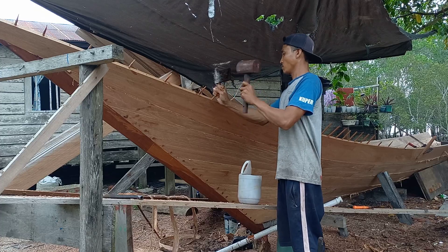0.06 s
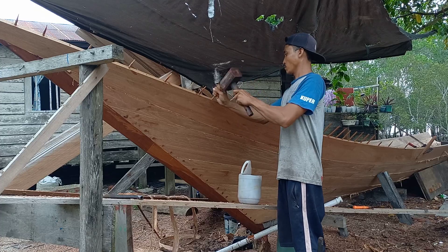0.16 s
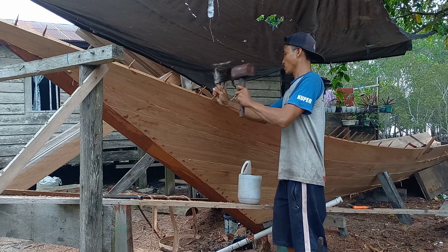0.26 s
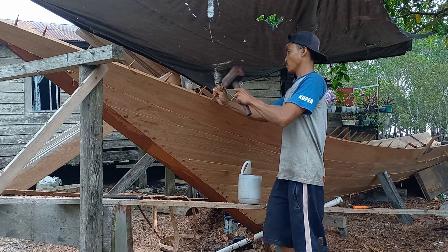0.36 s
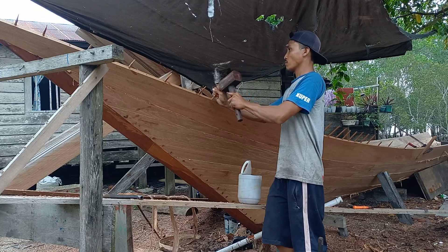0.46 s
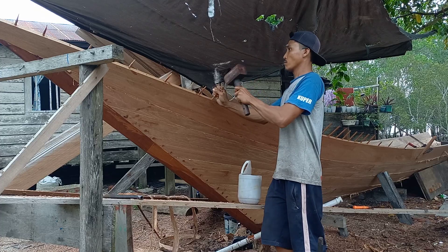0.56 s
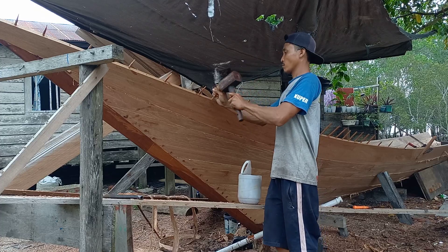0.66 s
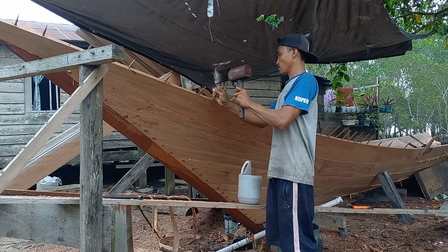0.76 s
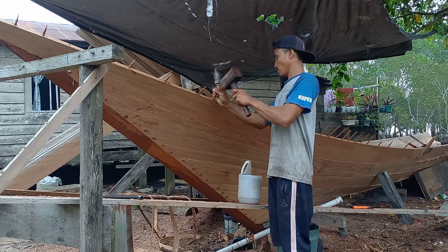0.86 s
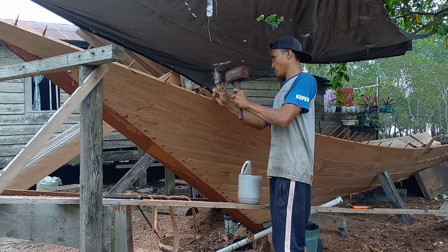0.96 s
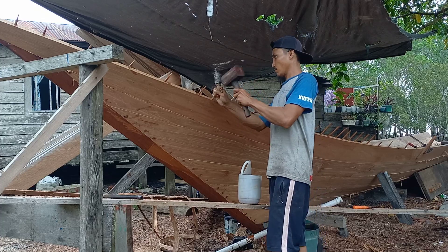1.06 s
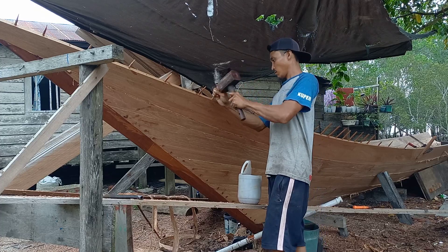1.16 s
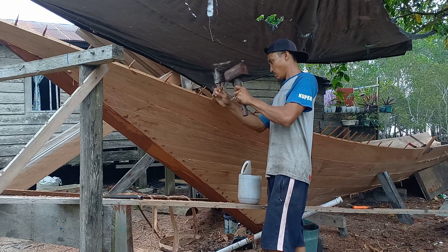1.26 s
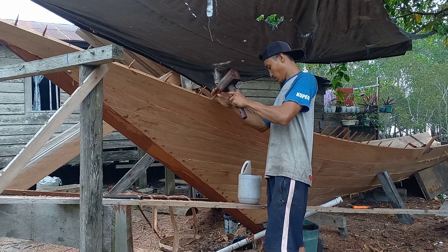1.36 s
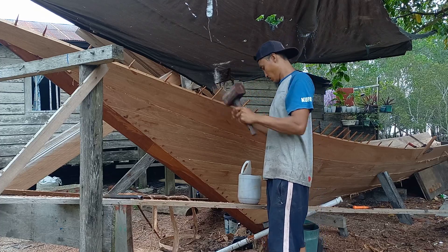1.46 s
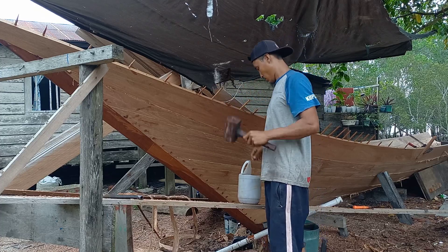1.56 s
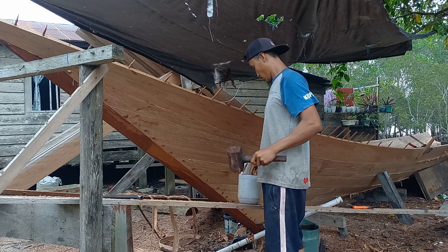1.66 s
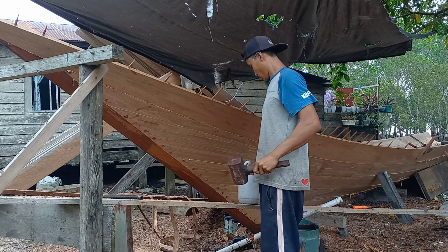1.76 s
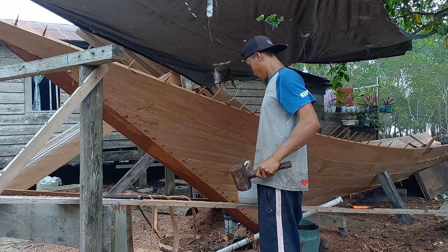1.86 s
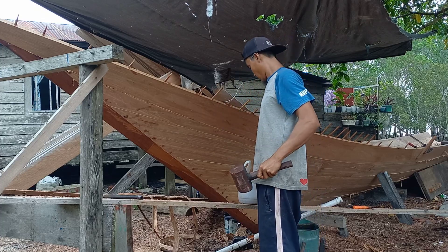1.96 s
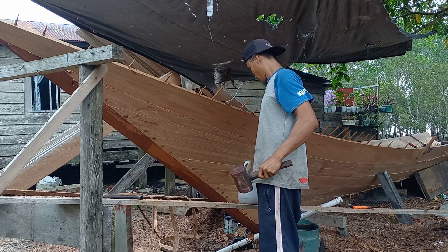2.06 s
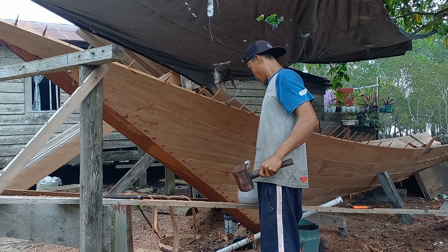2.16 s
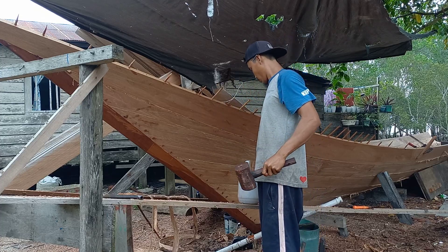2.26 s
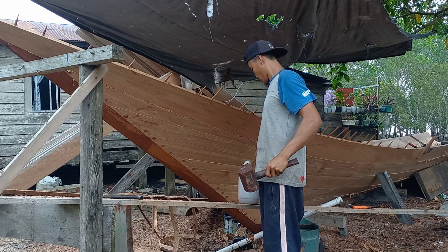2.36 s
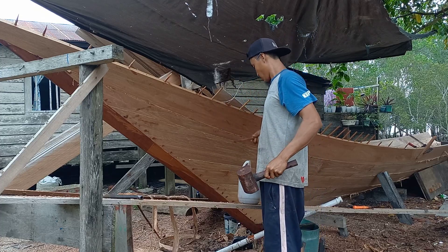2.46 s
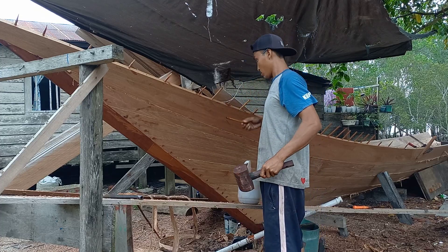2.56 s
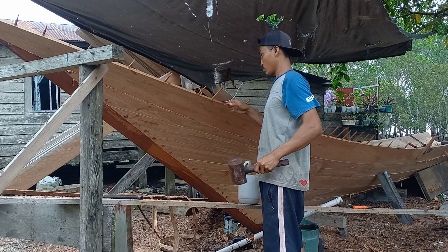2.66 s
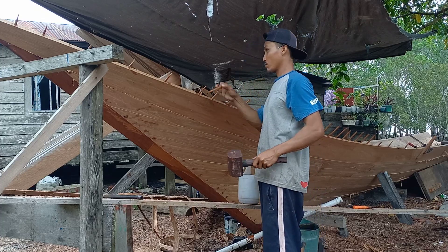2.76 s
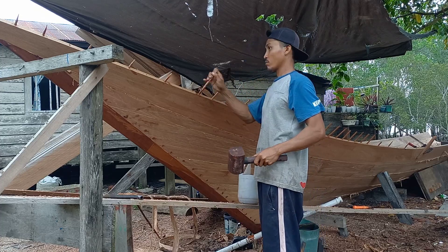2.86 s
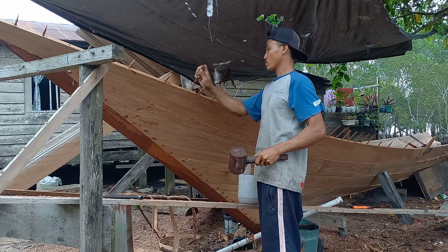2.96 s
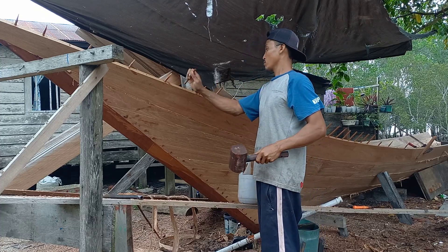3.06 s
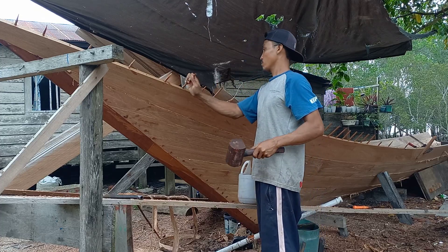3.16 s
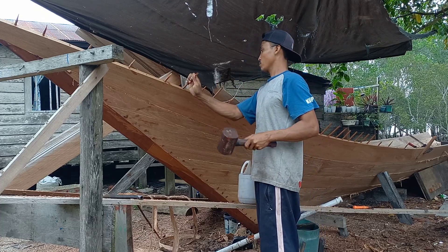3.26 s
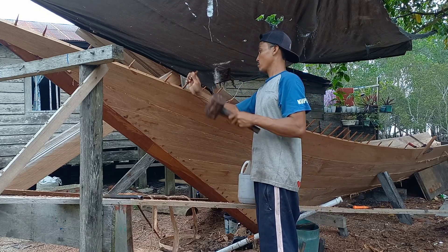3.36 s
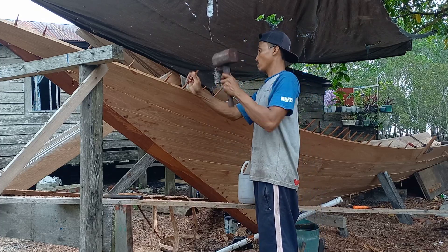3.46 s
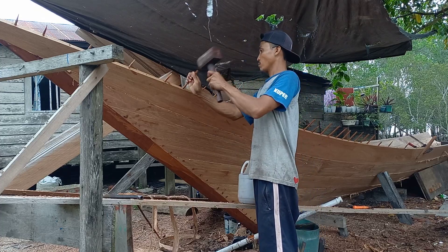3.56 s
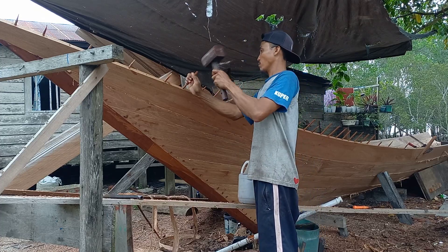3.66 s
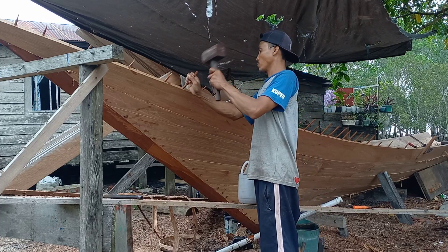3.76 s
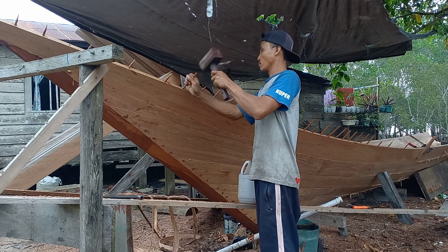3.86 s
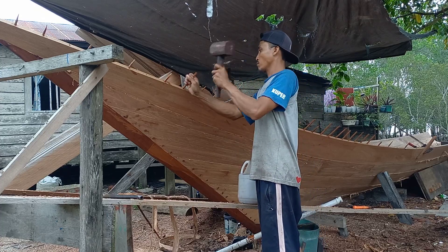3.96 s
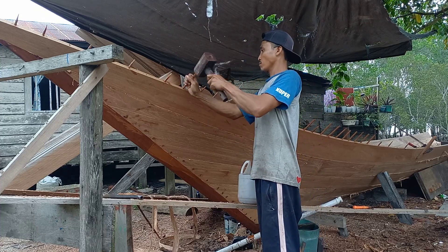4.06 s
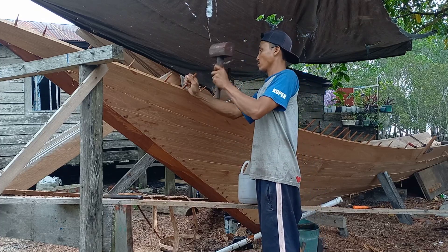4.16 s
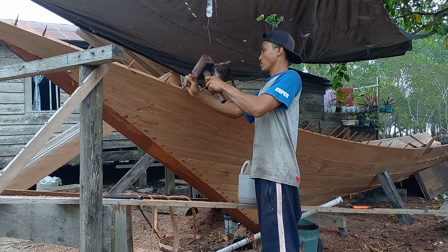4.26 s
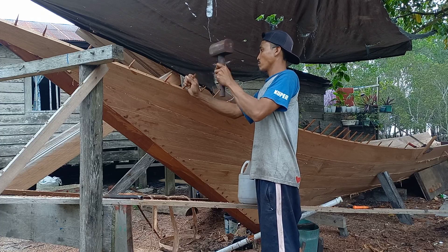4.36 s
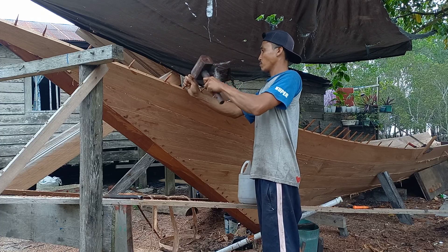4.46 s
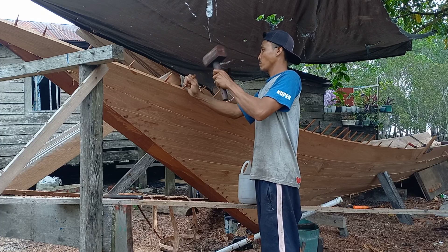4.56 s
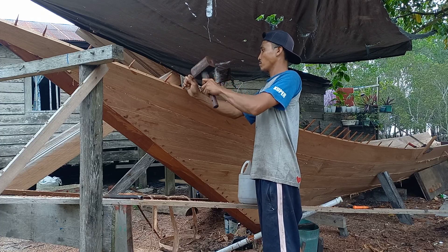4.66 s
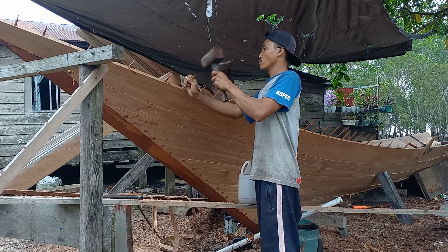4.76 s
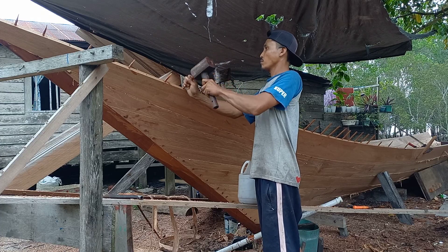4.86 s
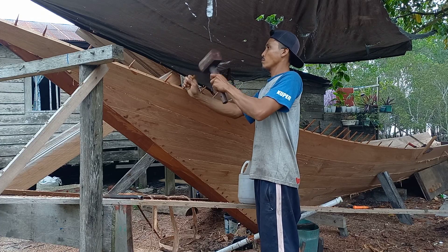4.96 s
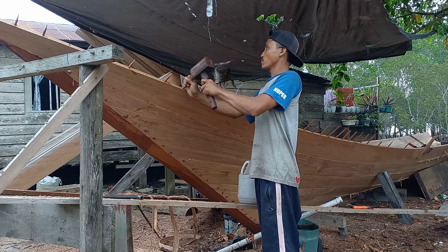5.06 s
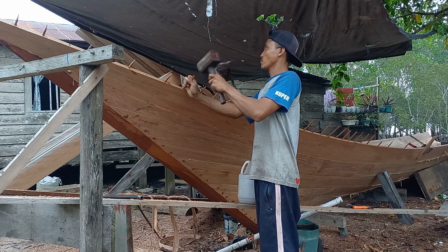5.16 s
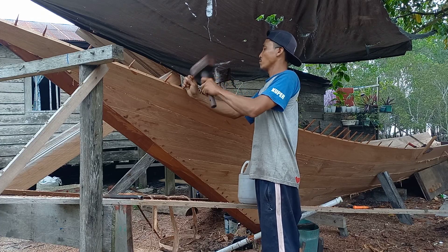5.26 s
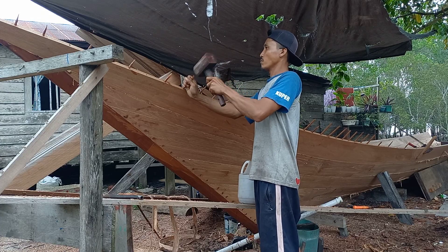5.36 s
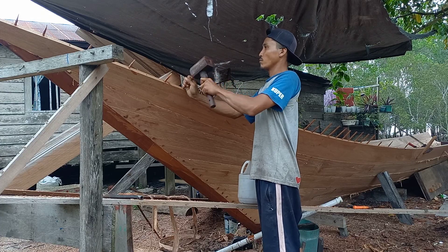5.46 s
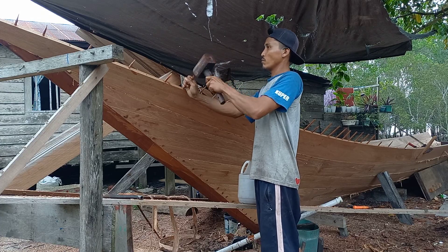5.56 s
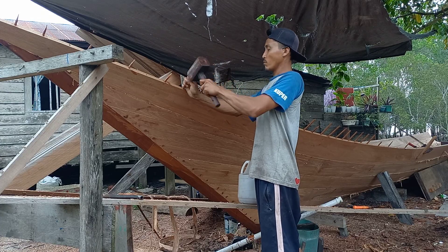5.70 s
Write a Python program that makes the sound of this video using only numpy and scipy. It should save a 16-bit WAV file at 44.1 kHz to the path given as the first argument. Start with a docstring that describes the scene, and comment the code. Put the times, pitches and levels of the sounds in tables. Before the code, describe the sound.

From the start, a wooden mallet close by drives a peg into a boat hull under an outdoor shelter. Nine quick blows fall, about six a second, each a sharp crack that spreads into the planking with a duller rebound. The hull rings more as the peg tightens, and the last blow, at 1.5 seconds, is a heavy thud. A bird whistles faint short slurs here and there, with one warble around 2 seconds. From 2.3 seconds the next peg scuffs softly against the wood, with two light taps near 3.6 seconds. From 3.7 seconds to the end, at about 5.7, ten more blows land on a second spot, slightly slower, with a few scuffs between them. Throughout, distant motorbikes drone over low road rumble and a thin hiss of insects and leaves; one engine revs up around 3 to 3.6 seconds.

```python
"""Distant motorbikes drone over road rumble and a thin hiss, and at once a mallet cracks in: it drives
a peg into a wooden hull, under a tarpaulin. Nine blows, the last a heavy thud; scuffs and light taps
as the next peg is set; then ten more at a second spot. Each blow cracks, spreads into the planking
and lands again as a duller rebound; the tighter the peg sits, the more the hull answers.
A bird whistles slurs and one warble from the trees."""
import sys
import numpy as np
from scipy import signal
from scipy.fft import rfft, irfft, next_fast_len
from scipy.io import wavfile
from scipy.ndimage import uniform_filter1d

SR = 44100
rng = np.random.default_rng(int(sys.argv[2]) if len(sys.argv) > 2 else 0)


def persist_wave(psi):
    """Save psi, clipped to +-1, as 16-bit WAV."""
    counts = np.round(np.clip(psi, -1, 1) * 32767).astype(np.int16)
    wavfile.write(sys.argv[1], SR, np.atleast_2d(counts).T)


N = 252690
TIME = np.arange(N) / SR
RING = TIME[:16384]  # time axis of one hit and its tail
MIC_LAG_S = 2 / SR  # the peg stands a little to the left, so the right microphone hears it later


def amp(db):
    """Decibels to gain."""
    return 10 ** (np.asarray(db) / 20)


def unit(x):
    """Scale to rms 1."""
    return x / np.sqrt(np.mean(x ** 2))


def curves(table):
    """Breakpoints with time in the first column to one curve for each other column."""
    s, *columns = np.transpose(table)
    return [np.interp(TIME, s, c) for c in columns]


def at_hz(table, hz):
    """Read a table with frequency in the first column, on a log-frequency axis."""
    freqs, *columns = np.transpose(table)
    return [np.interp(np.log(hz + 1), np.log(freqs), c) for c in columns]


def cut(x, hz, kind, order=2):
    """Low-pass or high-pass."""
    return signal.sosfilt(signal.butter(order, min(hz, SR / 2 - 1), kind, fs=SR, output="sos"), x)


def drift(rate_hz):
    """Smooth random modulation, rms 1."""
    hold = int(SR / rate_hz)
    steps = np.repeat(rng.standard_normal(N // hold + 1), hold)
    return unit(uniform_filter1d(uniform_filter1d(steps, hold), hold)[:N])


def add(out, start_s, x):
    """Mix x into out from start_s."""
    i = max(int(start_s * SR), 0)
    out[:, i:i + x.shape[1]] += x[:, :max(N - i, 0)]


def width(hz, full_width_hz=2800):
    """Side-to-mid ratio at two close microphones: long waves reach both alike."""
    return np.clip(hz / full_width_hz, .2, 1)


def air_spectrum(size):
    """Frequencies and a random stereo spectrum of sound arriving from all around."""
    hz = np.fft.rfftfreq(size, 1 / SR)
    mid, side = rfft(rng.standard_normal((2, size)))
    return hz, mid + np.outer([1, -1], side * width(hz))


def noise(colour, size):
    """Stereo noise of a given colour, rms 1."""
    hz, bins = air_spectrum(2 * next_fast_len(size // 2 + 1))
    return unit(irfft(bins * amp(at_hz(colour, hz)[0]))[:, :size])


def decay(t60_s, rise_s):
    """Hit envelope: swell, then die away."""
    return (1 - np.exp(-(RING / rise_s) ** 2)) * np.exp(-np.log(1000) * RING / t60_s)


# the nearer bike idles, revs and changes gear; the farther is steadier: time_s, cycle_hz, level_db
NEAR_BIKE = [(0.0, 65, -54), (1.6, 50.5, -56), (2.3, 47.6, -53), (2.62, 29.5, -65), (2.8, 29.2, -56),
             (2.9, 28.6, -48.5), (3.0, 32, -43), (3.1, 34.7, -40.5), (3.2, 43, -38.5), (3.3, 46.6, -33.5),
             (3.39, 50.3, -39), (3.47, 48.4, -41), (3.55, 46.4, -38), (3.65, 38.6, -48), (3.8, 43, -53),
             (4.55, 57, -50), (4.82, 47.6, -52), (5.02, 54, -40), (5.36, 64, -45.5), (5.48, 50.4, -50.5),
             (5.73, 44, -43)]
FAR_BIKE = [(0.0, 45.5, -48.5), (1.0, 52.7, -50.5), (1.7, 50, -51.5), (2.05, 53.6, -54), (2.45, 53, -54.5),
            (2.8, 50, -71), (3.7, 59, -64), (4.2, 60.6, -51), (5.73, 77, -54.5)]
# each silencer's resonances, and the colour of the mechanical whirr: freq_hz, gain_db
NEAR_SILENCER = [(60, -50), (110, -28), (150, -11), (175, 0), (210, 0), (250, -5), (300, -13), (345, -22),
                 (400, -16), (460, -13), (500, -19), (560, -28), (680, -24), (800, -30), (1200, -34)]
FAR_SILENCER = [(60, -42), (140, -22), (200, -17), (270, -1.5), (320, -6.5), (380, -18), (470, -34),
                (600, -42), (1200, -40)]
WHIRR_COLOUR = [(200, -16), (450, 2.5), (800, -4), (1100, -13), (1500, -19.5), (3000, -29)]


def motorbike(revs, silencer, odd_db, whirr_db, harmonics, fade_db=.85):
    """A distant engine: harmonics of its cycle sweep through the silencer's resonances, odd ones weaker."""
    hz, db = curves(revs)
    phase = 2 * np.pi * np.cumsum(hz * (1 + .003 * drift(30))) / SR
    fades = [drift(18) for _ in range(5)]
    exhaust = 0
    for k in harmonics:
        # harmonics fade in and out on their way here, the high ones more
        path_db = fade_db * np.sqrt(k) * fades[k % len(fades)]
        harmonic_db = at_hz(silencer, k * hz)[0] + odd_db * (k % 2) + path_db
        exhaust = exhaust + amp(harmonic_db) * np.sin(k * phase + rng.uniform(0, 2 * np.pi))
    return amp(db) * (np.sqrt(2) * exhaust + amp(whirr_db) * noise(WHIRR_COLOUR, N))


# fader moves of the road and the hiss: time_s, relative_db
ROAD_LEVEL = [(0.0, -43), (1.5, -51), (2.68, -51), (3.22, -42), (3.8, -44.5), (4.74, -47), (4.98, -46.5),
              (5.73, -46)]
HISS_LEVEL = [(0.0, -57.5), (0.44, -60), (1.91, -64), (3.22, -59.5), (5.73, -61)]
# their tone colours: freq_hz, gain_db
ROAD_COLOUR = [(25, -11), (70, -34), (105, -17.5), (150, -1.5), (200, 8.5), (280, -3.5), (360, -9.5),
               (480, -13.5), (650, -15), (1100, -23.5), (2000, -36), (4000, -59)]
HISS_COLOUR = [(500, -9), (1500, -8), (2500, -0.5), (3800, 3.5), (5000, -0.5), (7500, -0.5), (10000, 4),
               (11200, 4), (12200, 7), (13000, -1), (15500, 0)]


def outdoors(road_db=-1.5, hiss_db=5):
    """The bed: road rumble swelling with the traffic, under a thin hiss of insects and leaves."""
    road = noise(ROAD_COLOUR, N) * amp(curves(ROAD_LEVEL)[0] + road_db + 0.9 * drift(14))
    hiss = noise(HISS_COLOUR, N) * amp(curves(HISS_LEVEL)[0] + hiss_db + drift(13))
    return road + hiss


def ring(modes, spot, rise_s, diffuse=1):
    """One stereo ring a mode; bending waves are slower in the bass, so low modes bloom later."""
    out = []
    for (hz, t60_s, *spot_db), (phase, lag) in zip(modes, rng.uniform(-np.pi, np.pi, (len(modes), 2))):
        # a wide source comes from all sides, a small one reaches the left microphone first
        lead = diffuse * lag * width(hz) + (1 - diffuse) * 2 * np.pi * hz * MIC_LAG_S
        mic_phases = phase + np.array([[1], [-1]]) * lead / 2
        envelope = decay(t60_s, rise_s * np.sqrt(1000 / hz))
        out.append(amp(spot_db[spot]) * np.sin(2 * np.pi * hz * RING + mic_phases) * envelope)
    return np.array(out)


def struck(modes, scatter_db=2.5):
    """The modes sounding together, in a new balance for every blow."""
    shares = unit(amp(scatter_db * rng.standard_normal(len(modes))))
    return np.tensordot(shares, modes, axes=1)


def detuned(x, scatter=0.004):
    """The same ring, a little higher or lower from blow to blow."""
    stretch = 1 + scatter * rng.standard_normal()
    return np.array([np.interp(RING * stretch, RING, channel) for channel in x])


def wash(bands):
    """Countless overlapping modes: half-octave noise bands, each with its own swell and decay."""
    hz, spectrum = air_spectrum(len(RING))
    out = 0
    for centre_hz in 62.5 * 2 ** (np.arange(17) / 2):
        db, t60_s, rise_s = at_hz(bands, centre_hz)
        octaves_outside = max(np.log2(bands[0][0] / centre_hz), np.log2(centre_hz / bands[-1][0]), 0)
        window = np.cos(np.pi / 2 * np.clip(2 * np.log2((hz + 1) / centre_hz), -1, 1))
        band = unit(irfft(spectrum * window)) / np.sqrt(2)
        out = out + band * amp(db - 20 * octaves_outside) * decay(t60_s, rise_s)
    return out


def variants(bands, fresh):
    """No blow lands quite like the last: one wash a blow, with a share `fresh` of its power varying."""
    steady, wash_a, wash_b = [wash(bands) for _ in range(3)]
    while True:
        turn = rng.uniform(0, 2 * np.pi)
        varying = np.cos(turn) * wash_a + np.sin(turn) * wash_b
        yield np.sqrt(1 - fresh) * steady + np.sqrt(fresh) * varying


def snap(crack, boost=1.15, attack_s=.0005, direct_s=.0018):
    """The crack's direct sound stands out above the first reflections and arrives later on the right."""
    left, right = crack
    direct = np.exp(-RING / direct_s)
    delayed_left = np.interp(RING - MIC_LAG_S, RING, left)
    right = np.sqrt(direct) * delayed_left + np.sqrt(1 - direct) * right
    return np.array([left, right]) * (0.74 + boost * np.exp(-RING / attack_s))


def reflections(rate_hz=110, depth_db=2.2):
    """Posts, planks and the tarpaulin return the sound in uneven clumps."""
    return unit(amp(depth_db * drift(rate_hz)[:len(RING)]))


def thump(hz):
    """The single pressure swing a plank sends out under the mallet, peaking 1 / hz seconds in."""
    u = np.pi * hz * (RING - 1 / hz)
    return (1 - 2 * u ** 2) * np.exp(-u ** 2)


def wall_echo(contact, front_s=.0014):
    """The far wall returns only the sharp front of the crack."""
    return cut(cut(contact, 3300, "high"), 2500, "low", order=1) * np.exp(-RING / front_s)


# mallet blows: start_s, strength_db, brightness_db, rebound_delay_s, rebound_relative_db
BLOWS = [(0.092, -33, 1, 0.015, 2), (0.2756, -32.5, 0, 0.015, 0), (0.451, -32.5, -2.5, .02, 0.5),
         (0.6232, -32.5, -2, 0.016, 1), (0.799, -32, -4, 0.02, -6), (0.969, -32.5, -2, 0.018, -6.5),
         (1.1421, -33, -1.5, 0.018, 0), (1.3181, -33, -2.5, 0.021, 0), (1.4835, -34, -6.5, 0.034, -4),
         (3.7358, -43.5, -1.5, 0.012, 5), (3.952, -38.5, -1.5, 0.019, -18), (4.168, -37.5, 0, 0.018, -16),
         (4.3787, -37, -2, 0.014, -2), (4.599, -37, -2, 0.027, -7.5), (4.812, -36.5, -4.5, 0.029, -3.5),
         (5.019, -36.5, -3.5, 0.028, -2.5), (5.2271, -35.5, -8, 0.025, 1), (5.43, -36, -8.5, 0.026, 0),
         (5.635, -35.5, -6.5, 0.0255, -3.5)]
# modes of the hull, and of the peg in its plank: pitch_hz, t60_s, first_spot_db, second_spot_db
HULL_MODES = [(148.6, 0.18, -7.5, 5.5), (213.8, 0.15, 6.5, 4.5), (280, 0.23, -3, 4),
              (336.6, 0.18, -8.5, 2.0), (387.6, 0.25, -3.5, 2.0), (419, 0.22, -1, -1),
              (451.4, 0.18, -7.5, -36), (511.3, 0.16, -2.5, 3), (541.6, 0.16, -4, 9.5),
              (599, 0.16, 3.5, 7.0), (642.6, 0.13, 7.5, 5.5), (671, 0.15, -5, 6.5), (735, 0.2, -6, -9),
              (780.7, 0.13, 2, 3), (860, 0.14, -3.5, 3.5), (934, 0.14, -0.5, -8.0), (979, 0.15, -2, -5.5),
              (1037, 0.095, -25, 3), (1074, 0.14, -33, 2), (1154, 0.12, -19, 1), (1199, 0.15, -5, -10),
              (1231.5, 0.14, -5.5, 2.5), (1270, 0.14, -6, -1), (1321, 0.18, -9, -9),
              (1398, 0.13, -5.5, 2.5), (1465, 0.13, -3.5, 0.5), (1563, 0.08, -8.5, 5),
              (1615, 0.079, -3, -12), (1738, 0.095, -14, 3), (1785, 0.068, -14, 0), (1840, 0.033, -21, -9),
              (2002, 0.1, -3, 3.5), (2210, 0.13, -11.5, -6), (2360, 0.053, -1, -30), (2620, 0.1, 4, -25),
              (2636, 0.073, -2.5, -15)]
PEG_MODES = [(620, 0.055, 3.5, 7), (800, 0.05, 2, 7), (1254, 0.037, -4, -14), (1770, 0.062, -4, -1),
             (2790, 0.025, -8, 4), (3830, 0.018, 3, 10), (6380, 0.022, -0.5, -8), (13700, 0.018, -25, -6)]
# something light and metallic in the shelter sings along: pitch_hz, t60_s, relative_db
METAL_MODES = [(2390, 0.15, -10), (3676, 0.28, 0), (3896, 0.24, -2), (4016, .24, -1.5), (4360, 0.18, -4)]
# noise layers of a blow (attack, wooden body, room tail): band_hz, relative_db, t60_s, rise_s
CRACK_BANDS = [(300, -17, 0.0094, 0.0036), (802, 9.5, 0.01, 0.00011), (1800, -29, 0.017, 0.00011),
               (4140, 10.5, 0.0036, 0.00018), (6800, 11.5, 0.052, 0.000097), (8750, 8.5, 0.012, 0.0001),
               (11500, 4.5, 0.028, 0.00012), (14700, 17.5, 0.022, 0.000087)]
PLANKING_BANDS = [(62, -68, 0.14, 0.016), (100.7, -41, 0.27, 0.019), (142.7, 2, 0.19, 0.008),
                  (275, -2, 0.28, 0.0086), (457, -6.5, 0.28, 0.013), (700, 4, 0.13, 0.019),
                  (1010, -10.5, 0.28, 0.0029), (1880, -1.5, 0.11, 0.0032), (3260, 7.5, 0.051, 0.0029),
                  (5170, -12, 0.064, 0.0029)]
SHELTER_BANDS = [(101, -62, 0.63, 0.025), (244, -7.5, 0.48, 0.0027), (690, -18, 0.38, 0.0025),
                 (2040, -16, 0.44, 0.0091), (2930, -6.5, 0.26, 0.0029), (4000, -3, 0.3, 0.017),
                 (5800, -4, 0.25, 0.015), (8640, -16, 0.39, 0.0012), (13400, -4.5, 0.21, 0.0004)]


def hammering(spot, blows, hull_db, planking_db, peg_db, snap_db, thump_db, rebound_db, bass_db,
              shelter_db, seat_db_per_blow, peg_db_per_blow):
    """Crack, hull ring, room tail, rebound and echo; each blow seats the peg, so the hull rings louder."""
    sizzle_hz, sizzle_db_per_blow = 9200, 0.26  # the crack gains top as the peg seats
    rebound_hz, usual_bounce_s, hardening = 727, 0.016, 0.66  # a longer bounce lands harder and higher
    rattle_db_per_db = 0.77  # loose boards rattle in the shelter under a firm blow
    metal_db, echo_s, echo_db = -8, .069, -6.5
    out = np.zeros((2, N))
    hull = amp(hull_db) * ring(HULL_MODES, spot, rise_s=0.011)
    peg = amp(peg_db) * ring(PEG_MODES, spot, rise_s=0.00062, diffuse=0.19)
    metal = amp(metal_db) * ring(METAL_MODES, 0, rise_s=0.023)
    usual_db = np.median([db for _, db, *_ in blows])
    washes = zip(variants(CRACK_BANDS, fresh=0.72), variants(PLANKING_BANDS, fresh=0.3),
                 variants(SHELTER_BANDS, fresh=0.72))
    for k, (start_s, db, bright_db, bounce_s, bounce_db) in enumerate(blows):
        crack, planking, shelter = next(washes)
        crack = crack + (amp(k * sizzle_db_per_blow) - 1) * cut(crack, sizzle_hz, "high", order=1)
        knock = amp(k * peg_db_per_blow) * detuned(struck(peg), scatter=.025)
        contact = knock + amp(snap_db + bright_db) * snap(crack)
        seat_db = k * seat_db_per_blow
        body = amp(seat_db) * (detuned(struck(hull)) + amp(planking_db) * planking)
        body = body + (amp(bass_db - seat_db) - 1) * cut(body, 270, "low", order=1)  # holds the bass level
        room_db = shelter_db + rattle_db_per_db * (db - usual_db)
        room = amp(room_db) * (shelter * reflections() + struck(metal))
        # the second landing is a long soft push, so it stirs only the low modes
        thump_hz = rebound_hz * (bounce_s / usual_bounce_s) ** hardening
        dull_hit = amp(rebound_db) * cut(contact + body, 2.4 * thump_hz, "low")
        rebound = dull_hit + amp(thump_db + seat_db) * thump(thump_hz)
        add(out, start_s, amp(db) * (contact + body + room))
        add(out, start_s + bounce_s - 1 / thump_hz, amp(db + bounce_db) * rebound)
        add(out, start_s + echo_s, amp(db + echo_db) * wall_echo(contact))
    return out


def whistle(hz, gain, flutter_db=2.3):
    """A near-sine that flutters in pitch and level."""
    phase = 2 * np.pi * np.cumsum(hz * (1 + .007 * drift(160))) / SR
    return np.sqrt(2) * gain * amp(flutter_db * drift(90)) * np.sin(phase)


# short slurred notes: start_s, length_s, start_pitch_hz, end_pitch_hz, level_db
SLURS = [(0.659, 0.022, 3560, 3900, -43.5), (0.942, 0.019, 3330, 3960, -47.5),
         (1.073, 0.016, 3270, 3630, -50), (1.218, 0.018, 3000, 3560, -45.5),
         (1.742, 0.014, 11000, 9830, -59), (1.751, 0.018, 7900, 7300, -64),
         (1.763, 0.029, 6640, 6050, -63.5), (1.782, 0.081, 5400, 4750, -57),
         (2.229, 0.038, 3590, 3970, -49.5), (2.664, 0.093, 3304, 3860, -47.5),
         (2.758, 0.046, 3740, 3676, -51), (2.8, 0.15, 3760, 3540, -62), (3.887, 0.018, 11110, 9600, -55),
         (3.898, 0.068, 8000, 5400, -58), (4.71, 0.033, 5020, 4570, -51)]
# one long warble: time_s, pitch_hz, level_db
WARBLE = [(1.87, 4180, -68), (1.9, 3680, -56), (1.925, 3590, -55), (1.941, 3850, -54.5), (1.949, 3620, -57),
          (1.985, 3800, -50.5), (2.018, 3440, -54), (2.04, 3540, -53.5), (2.06, 3620, -52),
          (2.085, 3680, -49), (2.105, 3670, -59), (2.12, 3634, -70)]


def bird(trees_db=-6.5, trees_t60_s=0.43):
    """Slurs that swell and fade along a straight glide, and one warble, scattered by the trees."""
    hz, db = curves(WARBLE)
    warbling = (TIME > WARBLE[0][0]) & (TIME < WARBLE[-1][0])
    gain = uniform_filter1d(1. * warbling, size=200) * amp(db)
    for start_s, length_s, start_hz, end_hz, level_db in SLURS:
        on = (TIME > start_s) & (TIME < start_s + length_s)
        progress = (TIME[on] - start_s) / length_s
        hz[on] = start_hz + (end_hz - start_hz) * progress
        gain[on] = amp(level_db) * np.sin(np.pi * progress)
    song = whistle(hz, gain)
    trees = unit(rng.standard_normal((2, len(RING))) * decay(trees_t60_s, 0.012)) / np.sqrt(len(RING))
    return song + amp(trees_db) * signal.fftconvolve(song[None], trees)[:, :N]


# the ninth blow and its bounce: peak_s, level_db, pitch_hz
THUDS = [(1.4859, -11.5, 700), (1.5202, -11.5, 950)]
# the plank clatters under that bounce: start_s, level_db, t60_s
CLATTER = (1.5195, -23, 0.055)
# the clatter's woody colour: freq_hz, gain_db
CLATTER_COLOUR = [(300, -25), (600, -1), (900, 9), (1700, -10), (2300, -16), (5000, -37)]


def driven_home():
    """The peg can go no deeper: the plank takes the blow as one thud, the thrown-back mallet adds another."""
    out = np.zeros((2, N))
    for peak_s, db, hz in THUDS:
        add(out, peak_s - 1 / hz, amp(db) * thump(hz)[None])
    start_s, db, t60_s = CLATTER
    add(out, start_s, amp(db) * noise(CLATTER_COLOUR, len(RING)) * decay(t60_s, 0.00025))
    return out


# the peg scuffs against the wood: start_s, level_db, length_s, rasp_hz, lowpass_hz
SCUFFS = [(2.284, -47, .034, 2600, 3500), (2.329, -43.5, .005, 1100, 2600), (2.34, -38.5, .006, 1000, 3000),
          (2.36, -45, .004, 1300, 3200), (2.376, -46.5, .011, 1000, 2600),
          (2.4932, -37.5, .006, 2150, 4400), (3.412, -35, .006, 1790, 4000),
          (3.618, -41.5, .03, 1350, 6000), (4.01, -35.5, .022, 1990, 4000),
          (4.342, -41.5, .026, 1200, 3200), (4.686, -42.5, .04, 1450, 4000)]
# colour of the rub: freq_hz, gain_db
SCUFF_COLOUR = [(200, -22), (520, 7), (950, 3.5), (1400, -0.5), (2500, -6), (5500, -0.5), (9000, -12),
                (15000, -23)]


def scuffs(rasp_db=6, rasp_q=5, tail_db=-19, tail_t60_s=.3):
    """Soft rubs as the peg is set into the hull: each rasps at its own pitch and dies in the shelter."""
    out = np.zeros((2, N))
    for start_s, db, length_s, rasp_hz, lowpass_hz in SCUFFS:
        grit = amp(2 * drift(300)[:len(RING)])
        rub = cut(noise(SCUFF_COLOUR, len(RING)) * grit, lowpass_hz, "low")
        rasp = signal.lfilter(*signal.iirpeak(rasp_hz, rasp_q, fs=SR), rub)
        envelope = decay(6 * length_s, length_s / 5) + amp(tail_db) * decay(tail_t60_s, length_s)
        add(out, start_s, amp(db) * unit(rub + amp(rasp_db) * rasp) * envelope)
    return out


# the mallet touches the peg before the second run: start_s, level_db
TAPS = [(3.627, -45.5), (3.645, -50)]
# modes of that light touch: pitch_hz, t60_s, relative_db
TAP_MODES = [(526, 0.14, 11.5), (980, .1, -1), (1340, 0.067, 7), (2070, .1, -5), (2573, .1, -2)]


def taps():
    """Light wooden touches of the mallet on the peg."""
    out = np.zeros((2, N))
    modes = ring(TAP_MODES, 0, rise_s=0.0016)
    for start_s, db in TAPS:
        add(out, start_s, amp(db) * struck(modes))
    return out


def scene():
    """Two runs of blows up front, with the yard around them."""
    move_s = 2.5  # blows after this land at the second spot
    first_run = hammering(0, [b for b in BLOWS if b[0] < move_s], hull_db=0.5, planking_db=-0.5,
                          peg_db=2.0, snap_db=1.0, thump_db=9.5, rebound_db=-8.0, bass_db=3,
                          shelter_db=0.3, seat_db_per_blow=0.9542, peg_db_per_blow=1.3)
    second_run = hammering(1, [b for b in BLOWS if b[0] > move_s], hull_db=-0.5, planking_db=1.0,
                           peg_db=3.5, snap_db=4.5, thump_db=17.0, rebound_db=-14.0, bass_db=5.0,
                           shelter_db=5.5, seat_db_per_blow=0.5, peg_db_per_blow=-0.68)
    near_bike = motorbike(NEAR_BIKE, NEAR_SILENCER, odd_db=-12.5, whirr_db=-15.5, harmonics=range(2, 24))
    far_bike = motorbike(FAR_BIKE, FAR_SILENCER, odd_db=-7.5, whirr_db=-26, harmonics=range(2, 12))
    mallet_work = first_run + driven_home() + scuffs() + taps() + second_run
    return mallet_work + bird() + near_bike + far_bike + outdoors()


def record(dry):
    """The microphones shed the deep bass, the left is slightly duller, and the top is cut off steeply."""
    left, right = cut(dry, 41, "high")
    left = left - 0.51 * cut(left, 11700, "high", order=1)
    steep_lowpass = signal.ellip(8, .2, 70, 15700, fs=SR, output="sos")
    return signal.sosfilt(steep_lowpass, [left, right])


dry = scene()
out = record(dry)
persist_wave(out)
```